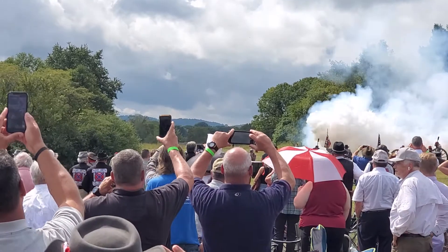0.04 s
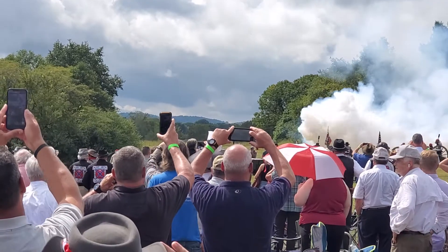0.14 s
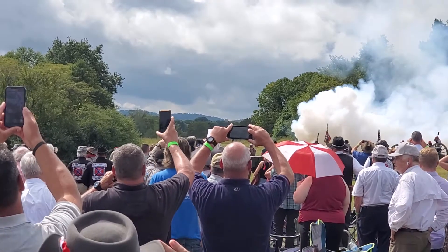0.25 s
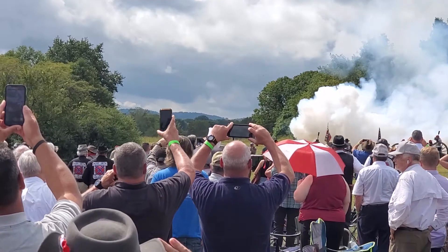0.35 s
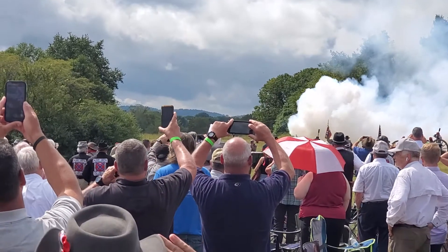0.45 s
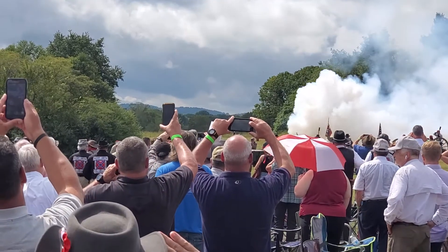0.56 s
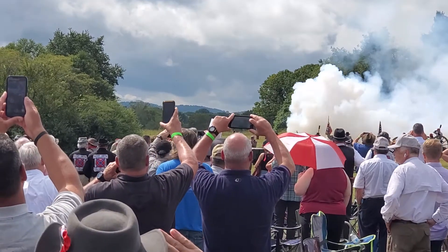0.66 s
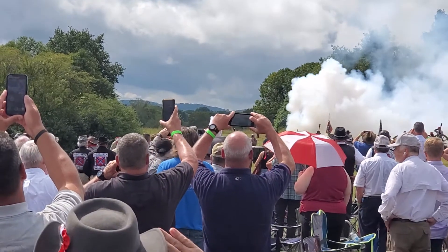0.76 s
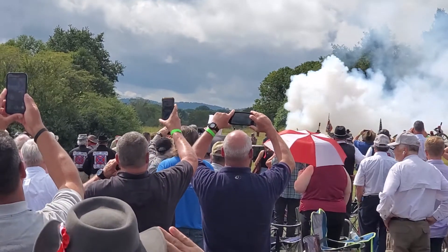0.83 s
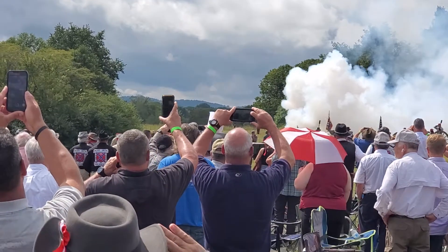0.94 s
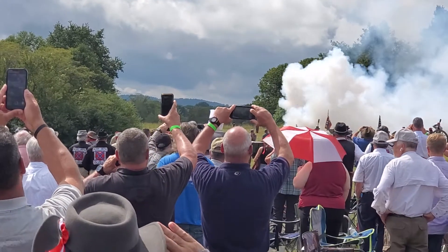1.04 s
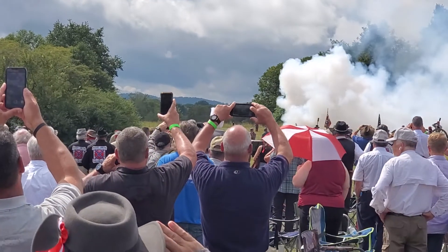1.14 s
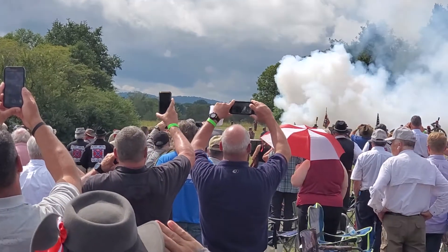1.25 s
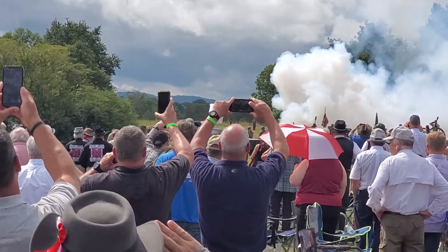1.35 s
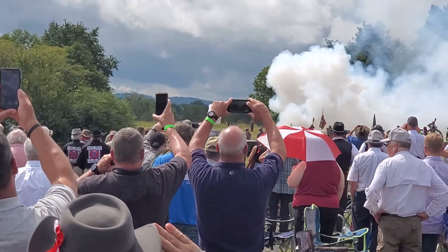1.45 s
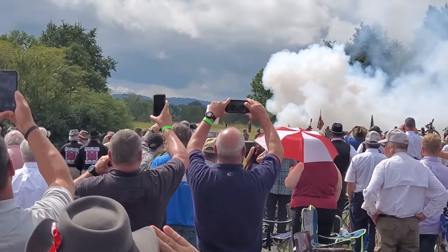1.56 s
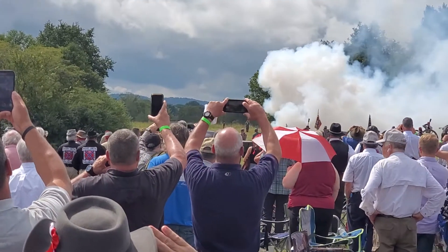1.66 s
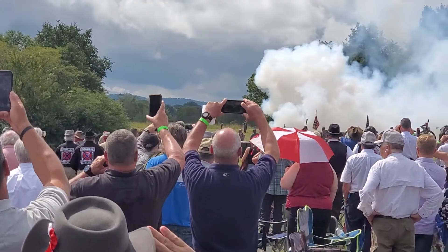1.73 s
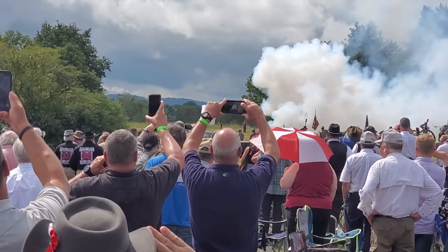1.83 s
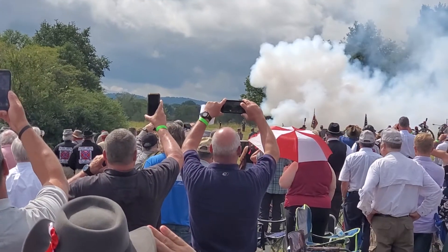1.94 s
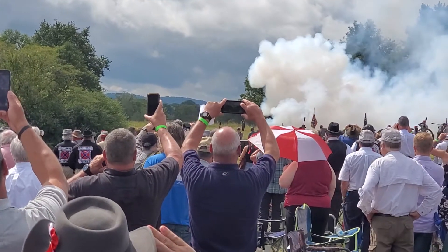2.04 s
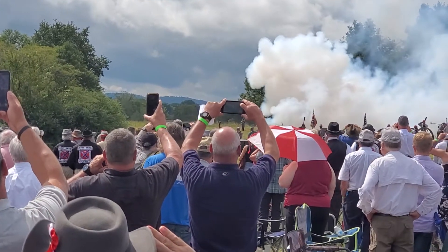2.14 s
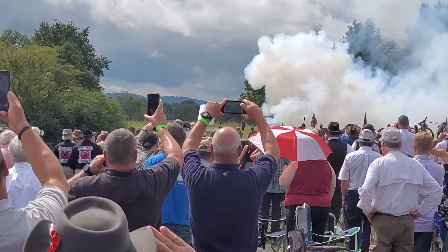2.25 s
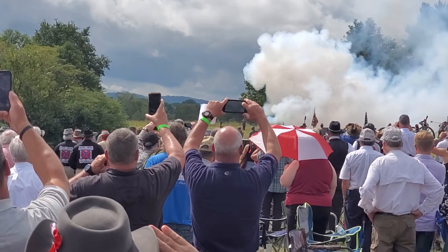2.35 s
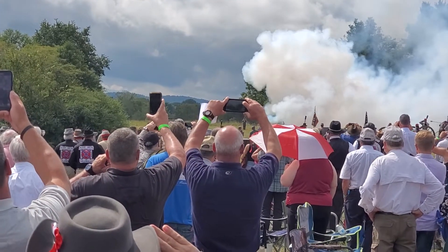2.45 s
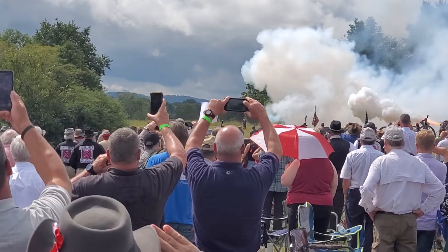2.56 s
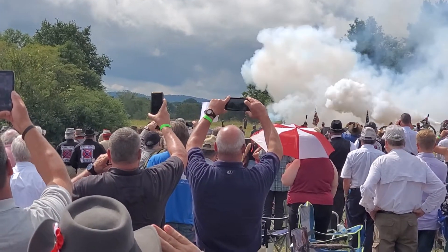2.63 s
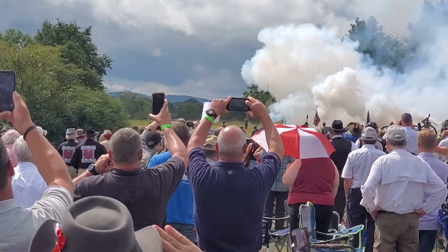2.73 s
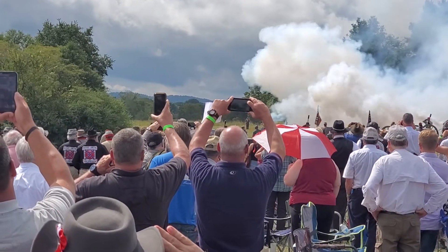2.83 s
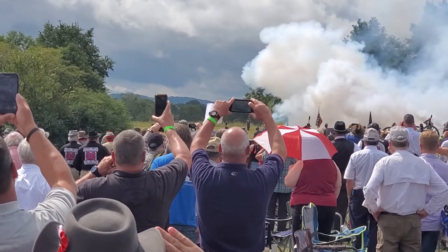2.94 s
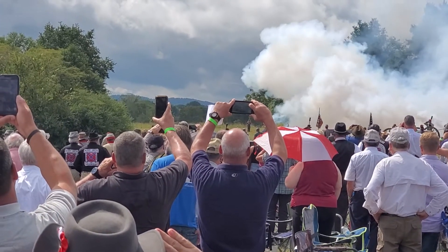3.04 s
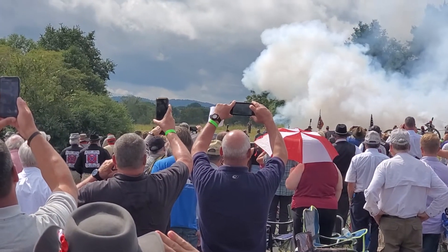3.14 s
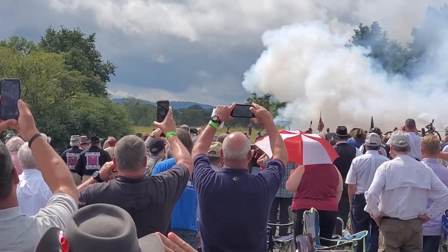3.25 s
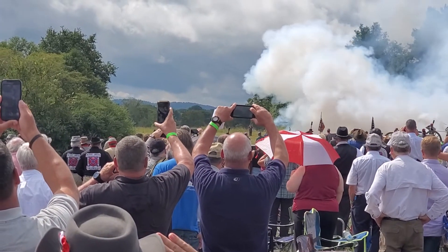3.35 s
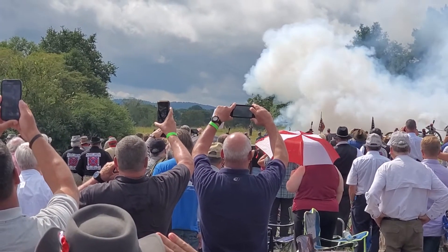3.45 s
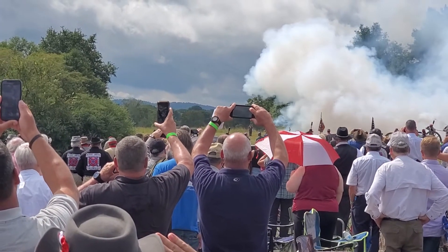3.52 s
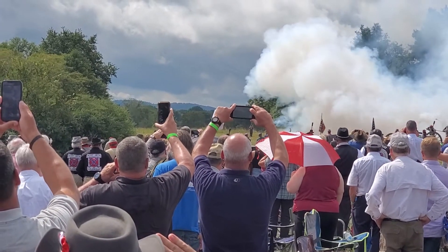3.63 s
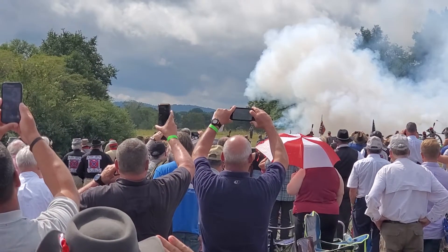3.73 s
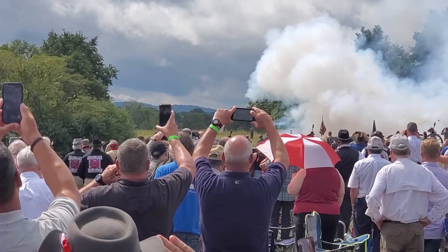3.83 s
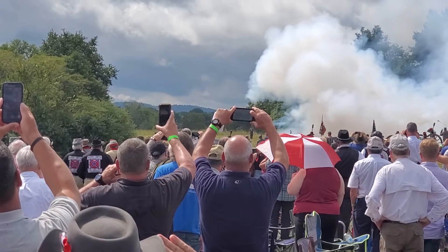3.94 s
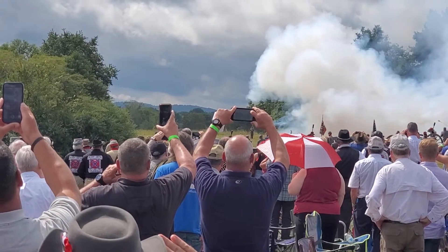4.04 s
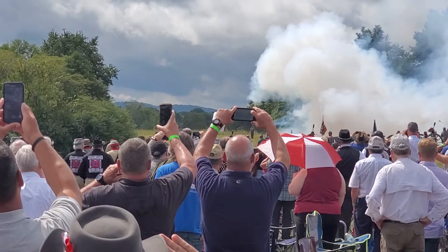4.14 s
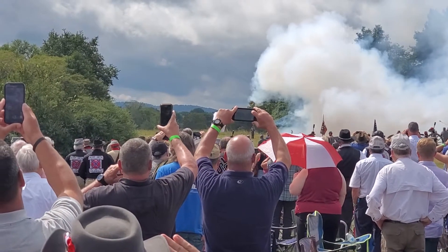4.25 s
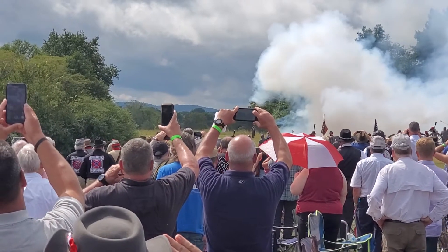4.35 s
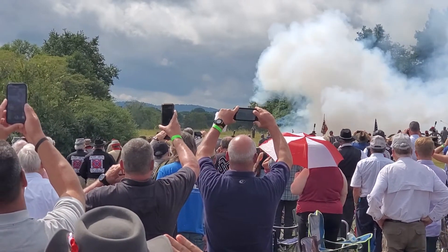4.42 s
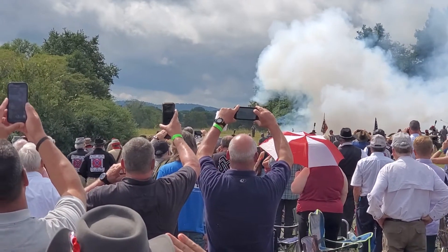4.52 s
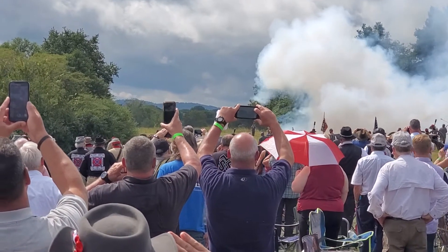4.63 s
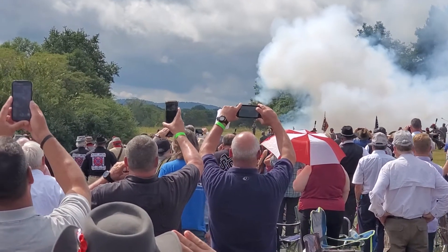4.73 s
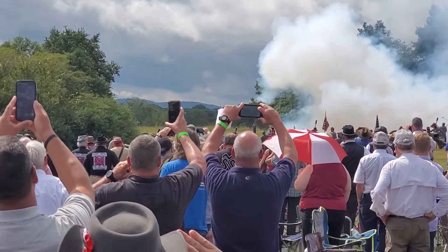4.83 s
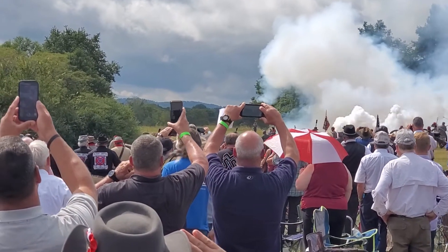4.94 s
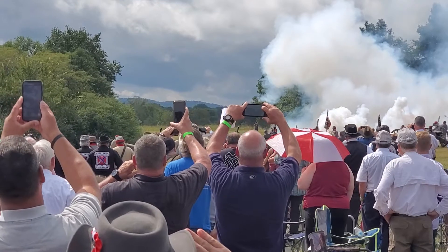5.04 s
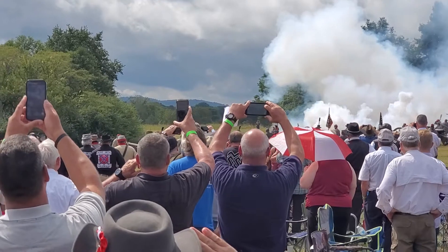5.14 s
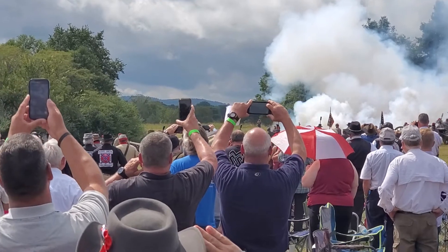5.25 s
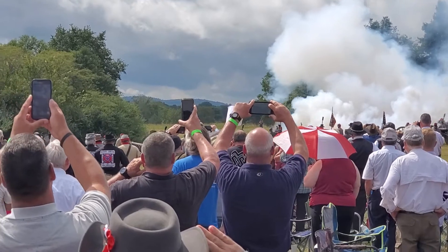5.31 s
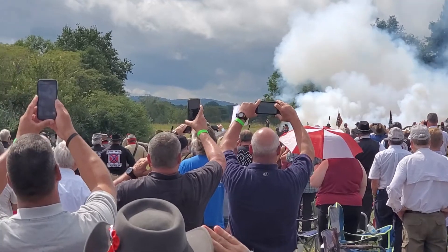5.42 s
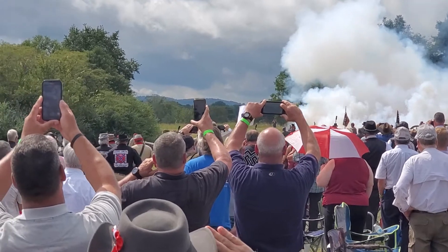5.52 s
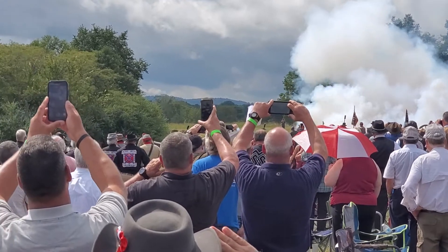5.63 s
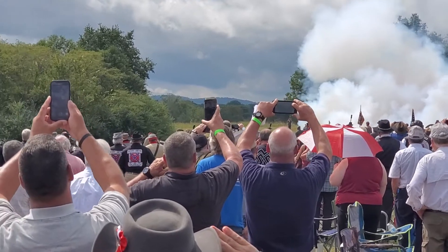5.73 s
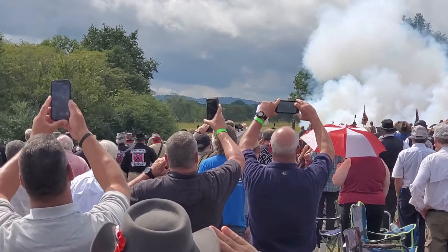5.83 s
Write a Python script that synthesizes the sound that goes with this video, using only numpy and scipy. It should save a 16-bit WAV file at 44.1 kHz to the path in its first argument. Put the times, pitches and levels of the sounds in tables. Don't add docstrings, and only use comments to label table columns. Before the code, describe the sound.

Three black-powder cannon salvos boom across an open meadow, each cracking sharply, thumping back off the hills and rolling away in a low rumble.

```python
import sys
import numpy as np
from scipy import signal
from scipy.io import wavfile
from scipy.ndimage import uniform_filter1d, minimum_filter1d

SR = 44100
rng = np.random.default_rng(int(sys.argv[2]) if len(sys.argv) > 2 else 0)


def unload_audio(sound):
    columns = np.transpose(np.atleast_2d(sound))
    steps = np.round(np.clip(columns, -1, 1) * 32767)
    wavfile.write(sys.argv[1], SR, steps.astype(np.int16))


def gain_from_db(level_db):
    decades = np.asarray(level_db, float) / 20
    return 10 ** decades


N = 259308
STEP_S = 0.001

# first_muzzle_s [s], main_crack_s [s], main_low_blast_s [s]
SALVOS = [
    (-.07, -.04, -.06),
    (2.668, 2.68, 2.68),
    (5.048, 5.083, 5.085),
]
# delay_s [s], peak_db in salvo 1, 2, 3 [dB], length_ms [ms]
HILLS = [(0.069, -18, -28, -3, 18), (0.124, 14.5, -26, 3, 7.3), (.154, 0, 2, 0, 6), (.183, 2.5, -13, 1, 11),
         (0.269, -12, -2, -7, 7.3), (0.3, 0, -2, 1.5, 17), (0.332, -21, -33, -21, 7.9),
         (0.383, 1, -4.5, 1, 10), (0.424, 1.5, -2, -17, 19), (0.483, 6, -2, 8, 8.9),
         (0.511, -24, -20, -2, 8), (0.553, -12, -4, -5, 40), (.59, -38, -8.5, -3, 14),
         (0.624, -1, -2, -16, 16), (0.649, -3, -24, -7.5, 10), (0.682, -6.5, -31, -3, 11),
         (0.731, 2, -1, -12, 23), (.799, -0.5, -7.5, 0, 13), (.859, -40, -38, -20, 18),
         (1.13, -8.5, -16, -12, 37), (1.167, -3.5, -10, -12, 15)]


def thumps():
    # crest_s [s], peak_db [dB], pitch_hz [Hz], length_ms [ms]
    blasts = [(2.681, -1.5, 71, 13), (2.695, -3, 71, 34), (5.042, -24, 100, 7.4), (5.057, 10, 68, 11.5),
              (5.073, -13.5, 132, 4.6), (5.087, -9, 140, 8.4), (5.098, -3.5, 153, 27),
              (5.121, 10, 143, 3.4), (5.134, 8, 130, 6.5), (5.177, -4, 123, 21), (5.286, 1, 136, 5.5),
              (0.894, -13, 65.6, 53), (0.925, -8.5, 76, 13), (1.162, -9, 88, 11), (1.238, -13, 98, 23),
              (1.306, -12, 81, 11), (1.849, -11.5, 76, 21), (1.998, -6.5, 58.7, 12), (2.077, -21.5, 66, 67),
              (2.331, -33, 70.5, 23), (3.574, -19.5, 71.4, 67), (3.716, -15.5, 81, 6.6),
              (4.444, -15, 63, 25), (4.725, -16, 91, 14), (5.532, -4, 73.4, 14)]
    rows = hill_returns() + list(blasts)
    out = np.zeros((2, N))
    t = np.arange(-3000, 3000) / SR
    side_gain = gain_from_db(np.array([[0.25], [-0.25]]))
    for (crest_s, db, hz, length_ms), chance in zip(rows, rng.random((len(rows), 1))):
        phase_turns = hz * t * (1 - 0.97 * t) + 0.25 * (chance - 0.5)
        envelope = np.exp(-(t / (0.57 * length_ms / 1000)) ** 2)
        wave = np.cos(2 * np.pi * phase_turns) * envelope
        ports = np.array([wave, np.roll(wave, 10)])
        add(out, crest_s + t[0], gain_from_db(db - 5.0) * ports * side_gain)
    return out


def hill_returns():
    near_hz, far_hz, dull_s, spread = 175.6, 86.2, 0.17, 0.061
    rows = []
    for (delay_s, *levels_db, length_ms), chance in zip(HILLS, rng.standard_normal((len(HILLS), 3))):
        pitch_hz = far_hz + (near_hz - far_hz) * np.exp(-delay_s / dull_s)
        pitches_hz = pitch_hz * (1 + spread * chance)
        for (_, _, blast_s), db, hz in zip(SALVOS, levels_db, pitches_hz):
            if blast_s + delay_s < N / SR:
                rows.append((blast_s + delay_s, db, hz, length_ms))
    return rows


def cracks():
    # start_s [s], peak_db [dB], centre_hz [Hz], decay_ms [ms]
    fronts = [(0.546, -17.5, 830, 2.3), (1.508, -24.5, 666, 10), (1.789, -50, 3160, 1.6),
              (1.972, -27, 700, 7.6), (2.147, -27.5, 1520, 2.9), (2.66, -13, 2570, 1.3),
              (2.6802, -3.5, 1310, 3.2), (2.685, -10, 690, 19), (3.475, -21, 1100, 9.1),
              (4.16, -31, 920, 8), (4.242, -38, 750, 7), (4.372, -54, 700, 5.3), (4.534, -31.5, 660, 5),
              (4.751, -35, 650, 4), (5.048, -18, 7000, 1.6), (5.057, -15, 590, 12), (5.068, -6, 1180, 2.1),
              (5.071, -15, 1440, 1.3), (5.077, -17, 800, 2.4), (5.0846, -12, 1840, 5)]
    out, t = np.zeros((2, N)), np.arange(1500) / SR
    for (start_s, db, hz, decay_ms), noise in zip(fronts, rng.standard_normal((len(fronts), 2, 1500))):
        front = (1 - t / 0.0001) * np.exp(-t / 0.00042)
        wake = 0.11 * noise * np.exp(-t / (decay_ms / 1000 + 1e-4))
        colour = signal.butter(2, [hz / 3.86, hz * 3.0], "band", fs=SR, output="sos")
        sound = signal.sosfilt(colour, front + wake)
        lag = round(lead_at(start_s) / 1000 * SR)
        ports = np.array([sound[0], np.roll(sound[1], lag)])
        add(out, start_s, gain_from_db(db) * ports / abs(sound).max())
    return out


def rumble():
    # pitch_hz [Hz], density_db [dB per Hz]
    colour = [(15, -39), (25, -17.5), (54, 16), (86, 5.5), (108, -8.5), (226, -30.5), (375, -32.5),
              (450, -49.5), (580, -37), (990, -120)]
    # delay_s [s], level_db [dB]
    roll_curve = [(0, -25.5), (.04, -16.5), (.24, -21.5), (.42, -16), (.82, -15), (1.02, -28),
                  (1.16, -22.5), (1.6, -27.5), (2.75, -30.5)]
    # deep_db [dB], upper_db [dB], bloom_db [dB]
    weights = [
        (-3.5, -2.5, -24.5),
        (-5.5, -5, -29),
        (-0.5, 0.5, -19.5),
    ]
    hz, z = field(colour, size=2048, patchy_db=2.85, flicker_db=2.16)
    t = np.arange(0, N / SR, STEP_S)
    deep_levels, upper_levels, bloom_levels = [], [], []
    for (first_s, _, _), (deep_db, upper_db, bloom_db) in zip(SALVOS, weights):
        age_s = t - first_s
        roll_db = np.interp(age_s, *np.transpose(roll_curve), -120, -120)
        upper_fall_db = np.maximum(5.5 - 19.5 * age_s, -10.5)
        deep_levels.append(roll_db + deep_db)
        upper_levels.append(roll_db + upper_db + upper_fall_db)
        bloom_levels.append(swell(age_s, 0.013, bloom_db, rise_ms=40, fall_db_per_s=47.5))
    lumps = evened(gain_from_db(2.5 * evened(uniform_filter1d(rng.standard_normal(N), size=700))))
    deep = summed(deep_levels) * gain_from_db(1.0) * band(hz, z, 26, 145)
    upper = summed(upper_levels) * gain_from_db(-1.5) * lumps * band(hz, z, 143.8, 268)
    bloom = summed(bloom_levels) * lumps * band(hz, z, 249, 504)
    return deep + upper + bloom


def roar():
    edges_hz = [450, 1700, 4600, 9000, 15750]
    # pitch_hz [Hz], density_db [dB per Hz]
    colour = [(180, -8), (300, 25), (461, -6), (663, 2.5), (893, -3.5), (1220, 0), (2220, -12.5),
              (2700, -6.5), (3960, -15.5), (5150, -27.5), (5790, -23.5), (7410, -23), (9820, -38),
              (12400, -36), (15600, -38.5)]
    # pitch_hz [Hz], density_db [dB per Hz]
    side_colour = [(180, -32), (300, -1), (378, 4), (439, 2), (663, 2.5), (1420, -6.5), (2040, 8),
                   (2990, -13), (3760, 5.5), (4740, -15.5), (6080, -1.5), (9500, -47), (15600, -51)]
    hz, z = field(colour, size=256, patchy_db=1.86, flicker_db=1.0, side_colour=side_colour)
    fronts = 0.58 * rng.random(N) * (rng.random(N) < 150 / SR)
    for delay_s, *levels_db, _ in HILLS:
        at = np.round((np.transpose(SALVOS)[2] + delay_s - 0.004) * SR).astype(int)
        heard = at < N
        fronts[at[heard]] += 0.84 * gain_from_db(np.array(levels_db)[heard])
    decay = np.exp(-np.arange(600) / SR / 0.004)
    crackle = 0.6 + uniform_filter1d(signal.oaconvolve(fronts, decay)[:N], size=40)
    bands = [gain * band(hz, z, lo_hz, hi_hz)
             for gain, lo_hz, hi_hz in zip(scattered(), edges_hz, edges_hz[1:])]
    return evened(crackle) * bands[0] + evened(crackle ** 0.49) * bands[1] + bands[2] + bands[3]


def scattered():
    # crest_delay_s [s], rise_ms [ms], fall_db_per_s [dB/s], body_db [dB], high_db [dB]
    trees = [(.02, 8, 305, 5.5, -9.5), (.06, 24, 119, -9.5, -10), (0.115, 10, 223, -5, -5),
             (0.198, 29, 54, -19, 2.9), (.25, 114, 139, 2.5, -10.5), (0.291, 150, 209, 4.5, -7),
             (0.378, 180, 72.5, -4.5, -9.5), (.52, 370, 71.5, 6.5, -5.5), (.725, 300, 79, 1, -9),
             (0.798, 180, 148, 2.5, -14.5), (1.008, 120, 29, -0.8, -2.5), (1.1, 280, 20.5, .5, -11),
             (1.6, 900, 7.5, 10, -8.5)]
    # level_db in salvo 1, 2, 3 [dB]
    trees_db = [(-33.5, -32, -32), (-39.5, -41.5, -44.5), (-42, -44, -40), (-37.5, -47, -39),
                (-30.5, -36, -33.5), (-39, -39, -35), (-27, -30.5, -25.5), (-39.5, -47, -38.5),
                (-32.5, -38, -33.5), (-35.5, -35.5, -34), (-47.5, -55, -45), (-43, -47, -33),
                (-61, -64, -54.5)]
    # crest_s [s], level_db [dB], rise_ms [ms], body_db [dB], high_db [dB]
    muzzles = [
        (0.084, -36.5, 16, -17, -5),
        (2.655, -51, 470, 1, -15),
        (2.664, -46, 12, 16.5, -17.5),
        (2.686, -20, 28, -5, -10),
        (5.035, -74, 900, 9, 7.5),
        (5.067, -28.5, 34, 4, -13.5),
        (5.089, -26.5, 11, -9, -6.5),
    ]
    t = np.arange(0, N / SR, STEP_S)
    body, mid, high, top = [], [], [], []

    def scatter(level_db, body_db, high_db, age_s):
        body.append(level_db + body_db)
        mid.append(level_db)
        high.append(level_db + high_db)
        top.append(level_db + high_db + np.minimum(-1, 15 - 55 * age_s))

    for (delay_s, rise_ms, fall_db_per_s, body_db, high_db), levels_db in zip(trees, trees_db):
        for (_, crack_s, _), db in zip(SALVOS, levels_db):
            level_db = swell(t, crack_s + delay_s, db, rise_ms, fall_db_per_s)
            scatter(level_db, body_db, high_db, t - crack_s)
    for crest_s, db, rise_ms, body_db, high_db in muzzles:
        scatter(swell(t, crest_s, db, rise_ms, fall_db_per_s=893), body_db, high_db, 0)
    top.append(-81)
    return [summed(levels) for levels in (body, mid, high, top)]


def ticks():
    # start_s [s], peak_db [dB], top_db (above 9 kHz) [dB]
    knocks = [(2.5084, -44, -31), (2.543, -47, -25), (2.547, -43, -13), (2.577, -48, -23),
              (2.6055, -50, -12), (2.624, -40, -10), (3.853, -33.5, -17), (3.9094, -46, -17),
              (3.9774, -37, -17), (3.9966, -40.5, -4), (4.0124, -37, -9), (4.058, -39.5, -16),
              (4.1234, -42, -22), (4.1594, -50, -25), (4.7511, -69, -17), (4.8394, -44, -10),
              (4.8744, -48, -6), (4.9684, -41, -1), (4.9814, -46, -21)]
    # pitch_hz [Hz], width_hz [Hz], level_db [dB]
    resonances = [
        (6450, 290, -11),
        (11200, 330, -18),
        (12600, 660, -12),
        (14800, 1100, -1),
    ]
    out, t = np.zeros((2, N)), np.arange(900) / SR
    for (start_s, db, top_db), rattle in zip(knocks, rng.standard_normal((len(knocks), 2, 900))):
        knock = rattle * np.exp(-t / 0.0021)
        ring = np.zeros(len(t))
        for hz, width_hz, ring_db in resonances:
            gain = gain_from_db(ring_db + top_db * (hz > 9000))
            ring += gain * np.sin(2 * np.pi * hz * t) * np.exp(-np.pi * width_hz * t)
        sound = signal.fftconvolve(knock, ring[None], axes=1)
        add(out, start_s, gain_from_db(db) * sound / abs(sound).max())
    return out


def hopper():
    # first_s [s], last_s [s], rate_per_s [1/s], peak_db [dB]
    train = (3.745, 5.04, 16.45, -68)
    first_s, last_s, rate_per_s, db = train
    out, t = np.zeros((2, N)), np.arange(530) / SR
    chirp = np.sin(2 * np.pi * (8750 * t - 22000 * t ** 2)) * np.hanning(len(t))
    ports = chirp * gain_from_db(np.array([[1.5], [-1.5]]))
    strokes_s = np.arange(first_s, last_s, 1 / rate_per_s)
    for stroke_s, (late, loud) in zip(strokes_s, rng.standard_normal((len(strokes_s), 2))):
        add(out, stroke_s + 0.002 * late, gain_from_db(db + 1.4 * loud) * ports)
    return out


def insect():
    # time_s [s], pitch_hz [Hz], level_db [dB]
    song = [(1.75, 5880, -88), (1.96, 5855, -73), (2.2, 5860, -80), (2.6, 5860, -84), (2.66, 5860, -100),
            (3.85, 5870, -85), (3.97, 5870, -76), (4.33, 5850, -80), (4.42, 5850, -69), (4.56, 5830, -73),
            (4.68, 5850, -71), (4.9, 5825, -71), (5.04, 5760, -73)]
    time_s, pitch_hz, level_db = np.transpose(song)
    t = np.arange(N) / SR
    waver_hz = 40 * evened(uniform_filter1d(rng.standard_normal(N), size=600))
    turns = np.cumsum(np.interp(t, time_s, pitch_hz) + waver_hz) / SR
    throb_db = 3.5 * evened(uniform_filter1d(rng.standard_normal(N), size=1500))
    tone = np.sin(2 * np.pi * turns) + gain_from_db(-3) * np.sin(np.pi * turns * 0.978)
    gain = gain_from_db(np.interp(t, time_s, level_db, -120, -120) + throb_db + 5)
    return gain * tone * gain_from_db(np.array([[1.5], [-1.5]]))


def air():
    # pitch_hz [Hz], density_db [dB per Hz]
    colour = [(240, -33), (400, 13.5), (425, -17), (452, 1), (705, 4.5), (835, -34), (1120, -16),
              (1410, -56), (2440, -6.5), (2800, -9), (4650, -63), (5940, -17), (10000, -54.5), (15600, -45)]
    hz, z = field(colour, size=1024, patchy_db=-4.0, flicker_db=3.2)
    return gain_from_db(-56) * band(hz, z, 300, 15800)


def field(colour, size, patchy_db, flicker_db, side_colour=None):
    # pitch_hz [Hz], share [0-1]
    same_curve = [(60, .995), (250, .95), (600, .88), (1400, .72), (2500, .45), (7000, .45), (15000, .45)]
    # pitch_hz [Hz], left_minus_right_db [dB]
    left_db = [(60, 0), (150, 1), (380, 1.5), (950, -4.5), (2380, -2.5), (5980, 4), (15000, -3.5)]
    hop = size // 4
    frames, hz = N // hop + 5, np.fft.rfftfreq(size, 1 / SR)
    a, b, c, d, patches = rng.standard_normal((frames, len(hz), 5)).T
    patches = uniform_filter1d(uniform_filter1d(patches, size=7, axis=0), size=24, axis=1)
    flicker = evened(uniform_filter1d(rng.standard_normal(frames), size=5))
    lead_ms = lead_at(np.arange(frames) * hop / SR)
    same = np.clip(read(same_curve, hz), 0, 1)[:, None]
    left = a + 1j * b
    delayed = left * np.exp(-2j * np.pi * hz[:, None] * lead_ms / 1000)
    right = same * delayed + np.sqrt(1 - same ** 2) * (c + 1j * d)
    lean = gain_from_db(read(left_db, hz) / 2)[:, None]
    aside = np.clip((lead_ms - 0.3) / 0.19, 0, 1)
    ahead_db = np.outer(read(colour, hz), 1 - aside)
    aside_db = np.outer(read(side_colour or colour, hz), aside)
    level_db = ahead_db + aside_db + patchy_db * evened(patches) + flicker_db * flicker
    return hz, np.array([left * lean, right / lean]) * gain_from_db(level_db)


def band(hz, z, lo_hz, hi_hz):
    size = 2 * len(hz) - 2
    share = 1 / np.sqrt((1 + (lo_hz / (hz + 1)) ** 16) * (1 + (hz / hi_hz) ** 16))
    x = signal.istft(z * share[:, None], nperseg=size, noverlap=3 * size // 4)[1][:, :N]
    return x / np.sqrt(uniform_filter1d(x.mean(0) ** 2, size=12000))


def lead_at(s):
    # delay_s [s], left_lead_ms [ms]
    bearing = [
        (0, -0.078),
        (.2, 0.1565),
        (.85, .17),
        (1.04, 0.4),
        (2.701, .37),
    ]
    first_s = np.transpose(SALVOS)[0]
    age_s = s - first_s[np.searchsorted(first_s, s) - 1]
    return np.interp(age_s, *np.transpose(bearing))


def swell(t, crest_s, db, rise_ms, fall_db_per_s):
    return db - np.maximum(36 * (crest_s - t) / rise_ms * 1000, fall_db_per_s * (t - crest_s))


def summed(levels_db):
    power = sum(gain_from_db(db) ** 2 for db in levels_db)
    return np.interp(np.arange(N) / SR, np.arange(len(power)) * STEP_S, np.sqrt(power))


def evened(x):
    return x / np.sqrt(np.mean(x ** 2) + 1e-20)


def read(points, hz):
    f, value = np.transpose(points)
    return np.interp(np.log(hz + 1), np.log(f + 1), value)


def add(mix, start_s, sound):
    start = round(start_s * SR)
    sound = sound[:, max(-start, 0):]
    part = mix[:, max(start, 0):][:, :sound.shape[1]]
    part += sound[:, :part.shape[1]]


def scene():
    return thumps() + rumble() + roar() + cracks() + ticks() + insect() + hopper() + air()


def top_cut(x):
    return signal.sosfilt(signal.butter(12, 15750, fs=SR, output="sos"), x)


def record(dry):
    heard = signal.sosfilt(signal.butter(2, 34, "high", fs=SR, output="sos"), dry)
    room = np.minimum(0.96 / (abs(heard).max(0) + 1e-9), 1)
    gain = uniform_filter1d(minimum_filter1d(room, size=301), size=221)
    return top_cut(heard * gain)


dry = scene()
out = record(dry)
unload_audio(out)
```